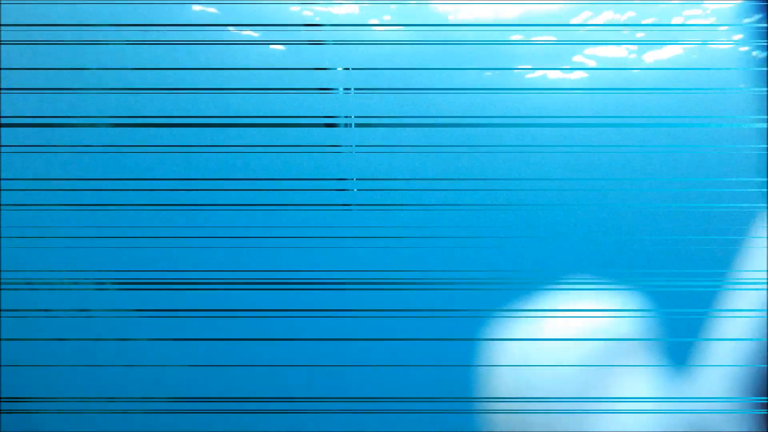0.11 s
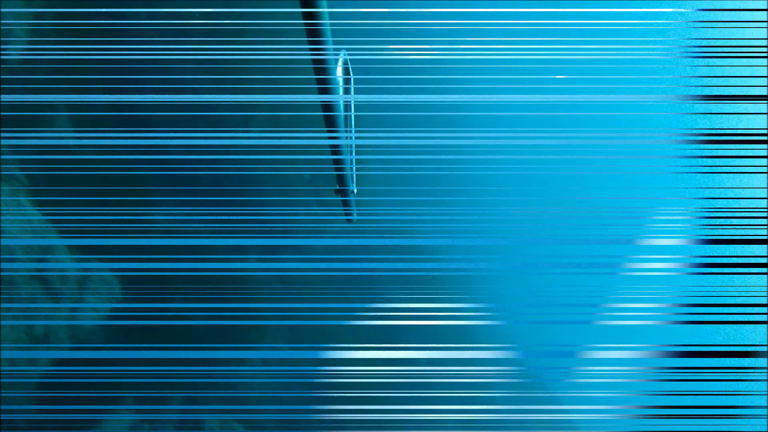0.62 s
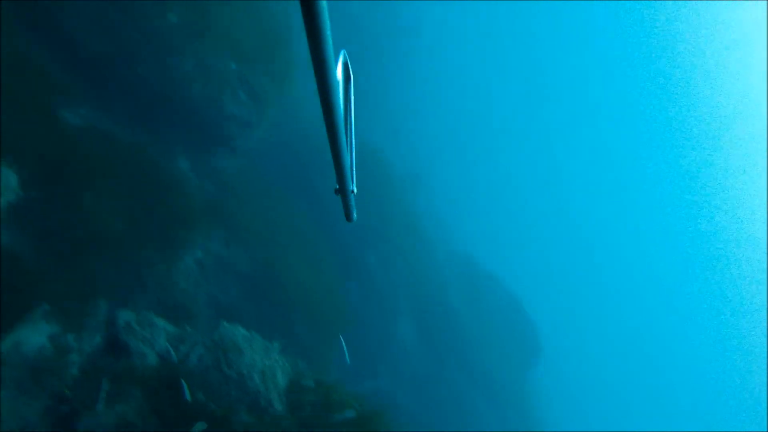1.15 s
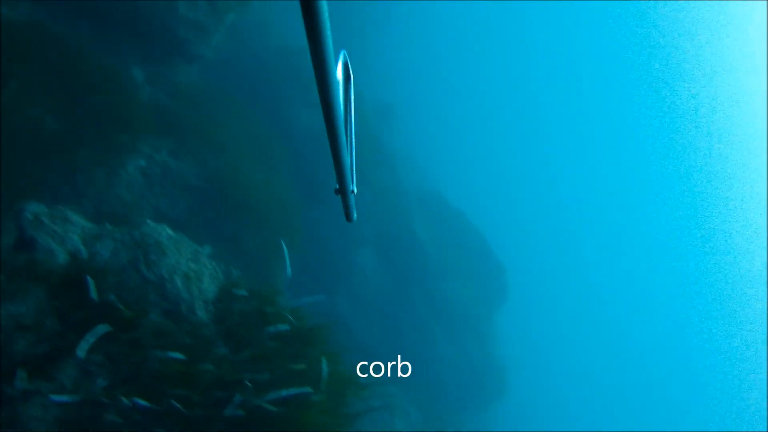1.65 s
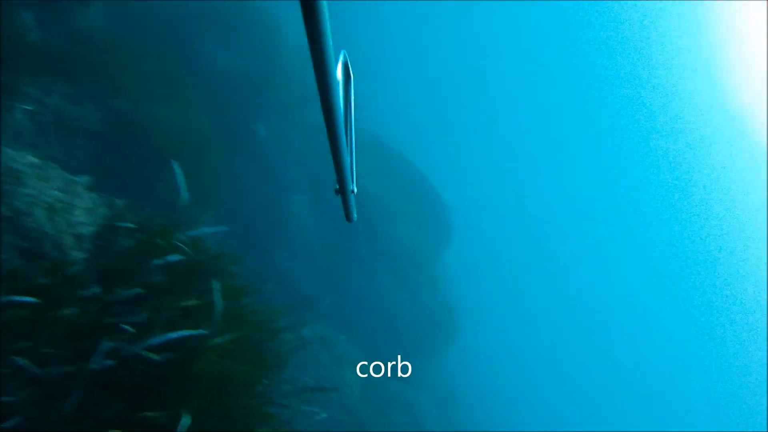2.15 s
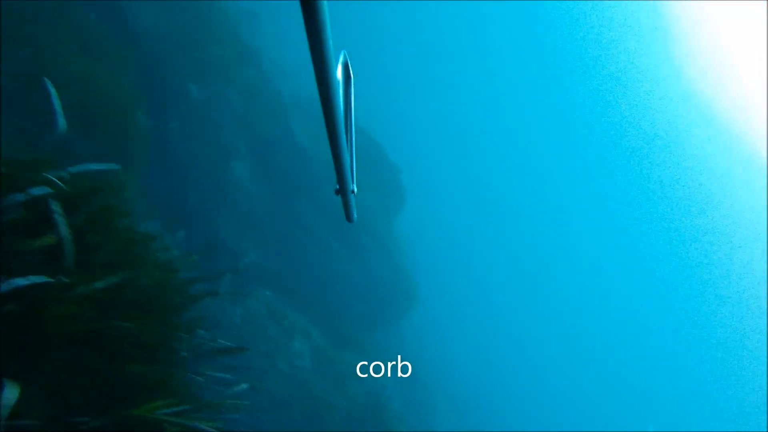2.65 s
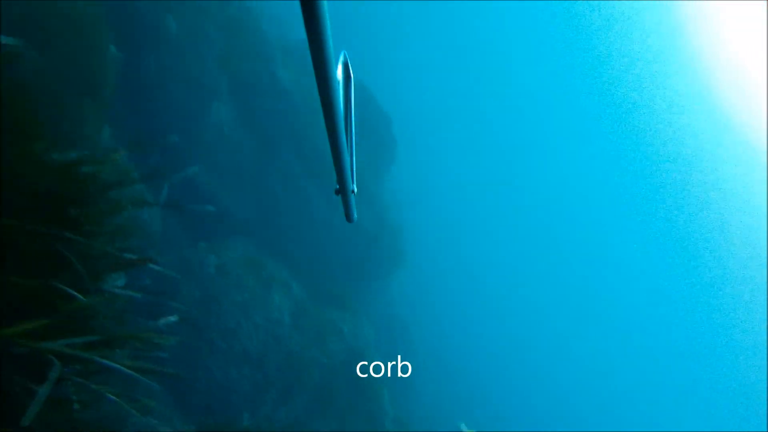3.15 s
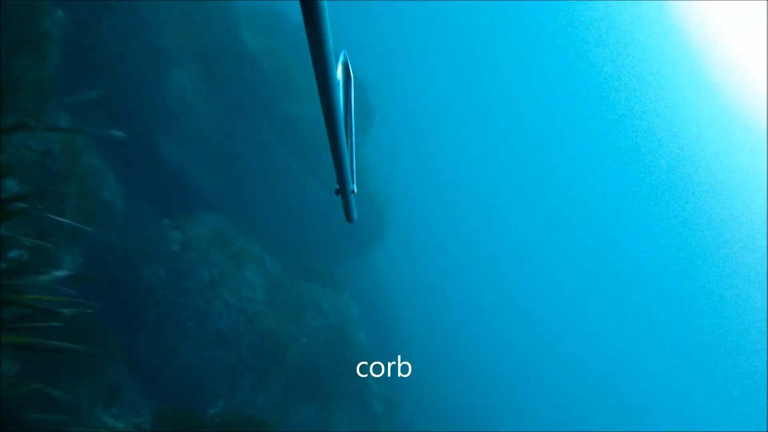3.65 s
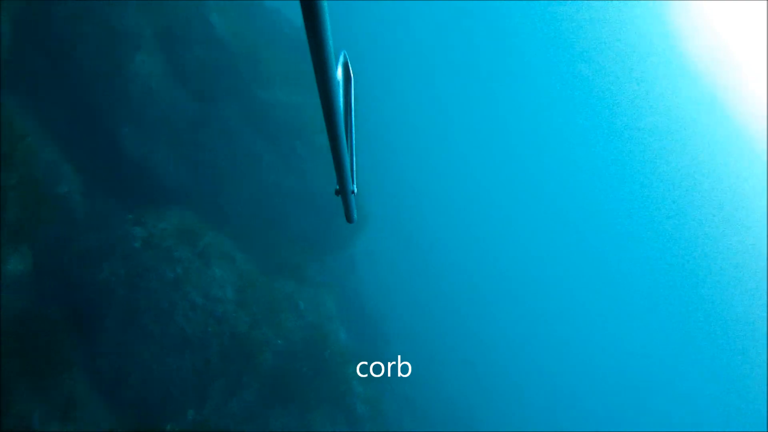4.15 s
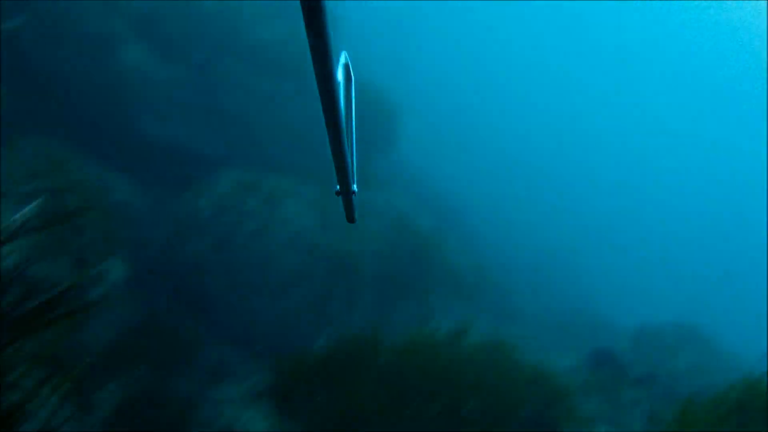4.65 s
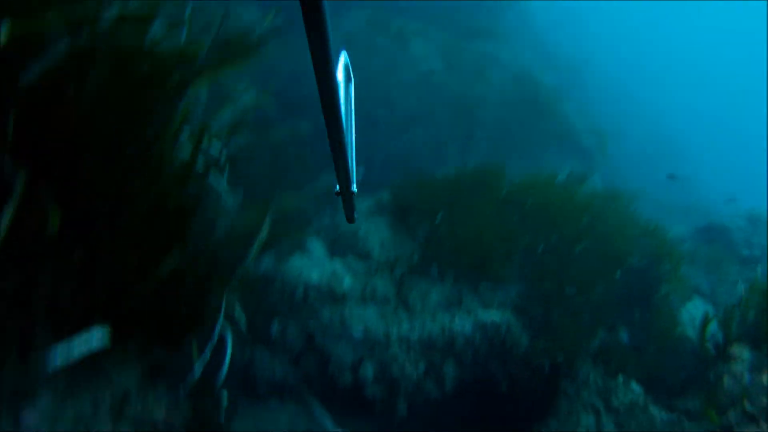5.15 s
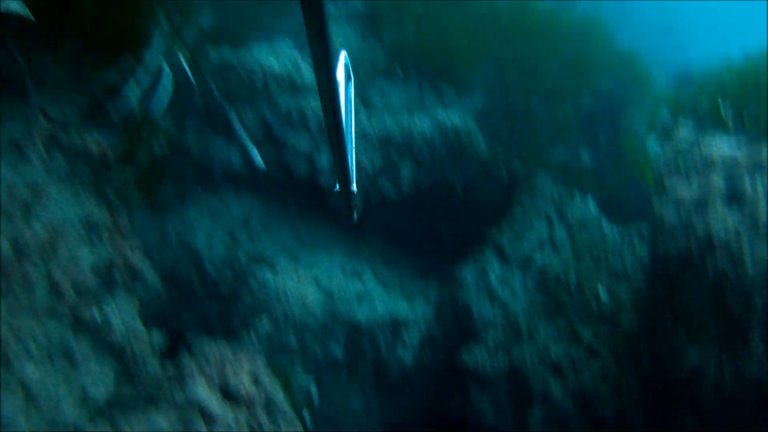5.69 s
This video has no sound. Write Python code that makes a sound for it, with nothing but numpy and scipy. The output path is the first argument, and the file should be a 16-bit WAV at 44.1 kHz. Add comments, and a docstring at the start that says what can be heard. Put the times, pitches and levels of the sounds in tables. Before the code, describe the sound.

A small sealed camera rides on a speargun under water. From 0 to 1.17 s handling is loud: low boom around 50 to 70 Hz surges in swells with gurgling, gloves rub the housing, and dry clicks cluster near 0.1 and 0.25 s. Dull thumps follow, with bubble-like rings near 0.2 and 0.6 to 0.7 s, a low groan around 0.85 s and the hardest knocks at 1.0 to 1.06 s. The sound is chopped off at 1.17 s. Then comes quiet murmur and hiss, thin shrimp crackle and faint wavering hums. Small taps occur at 2.55 and 3.0 s, and a short water surge with a soft bump at 3.2 s. Around 4.4 s another surge and rub lead into a faint ticking strap creak until 4.65 s. At 5.72 s a brisk scrape and knocks end in a hollow rising ring. Everything is close, boxy and muffled, with slightly gritty digital treble.

```python
"""Under water, a small sealed camera rides on a speargun. First the gun is handled roughly: water surges past the housing,
gloves rub it, parts knock and slip, bubbles ring. A cut, then calm sea: hiss, shrimp crackle, faint hums, taps, a creak,
a scrape and a last long ring. Flow and rubbing are wavering tones and shaped noise; knocks and blows are short fading tones
of the housing. The microphone is sampled at 12 kHz and each sample is held, which mirrors the sound into the treble."""
import sys
import numpy as np
from scipy import signal
from scipy.fft import rfft, irfft, next_fast_len
from scipy.io import wavfile
from scipy.ndimage import uniform_filter1d, map_coordinates

SR = 44100
rng = np.random.default_rng(int(sys.argv[2]) if len(sys.argv) > 2 else 0)


def to_wav(s):
    """Save 16-bit WAV."""
    ch = np.atleast_2d(s).T  # columns
    pcm = np.round(np.clip(ch, -1, 1) * 32767)  # PCM
    wavfile.write(sys.argv[1], SR, pcm.astype(np.int16))


def rack_gain(trim_db):
    """Turn a fader trim in dB into the linear factor to multiply a signal by."""
    fader = np.asarray(trim_db, float)
    return 10 ** (fader / 20)


N = 255780
CUT_S = 1.1655  # a cut between two shots: the rough handling is chopped off and the calm shot begins
CONTACT_LENGTH = SR // 16  # samples that one contact may last

# water surging round the housing, swell by swell: (time [s], level [dB], half width of the rise [s])
SWELLS = [(0.021, -26.5, 0.13), (.196, -16, 0.029), (.295, -20, 0.016), (.414, -17, .025),
          (.526, -17.5, 0.035), (.63, -16.5, 0.054), (.705, -19.5, 0.025), (.81, -22.5, 0.039),
          (.9, -25.5, .04), (1.004, -19.5, 0.049), (1.135, -20.5, .03), (1.23, -45, 0.045),
          (1.373, -40.5, 0.046), (1.48, -45.5, 0.028), (1.63, -46.5, 0.024), (1.72, -44.5, 0.032),
          (1.89, -41, 0.051), (2.02, -44, 0.075), (2.17, -52, 0.043), (2.33, -50.5, .04),
          (2.53, -42.5, 0.069), (2.72, -51, 0.071), (2.87, -45.5, 0.029), (3.05, -39, 0.074),
          (3.205, -23.5, 0.024), (3.27, -32, 0.022), (3.44, -43, .05), (3.63, -46.5, 0.053),
          (3.8, -40.5, 0.029), (3.94, -44, 0.038), (4.13, -41, 0.031), (4.276, -35.5, 0.049),
          (4.45, -28, 0.049), (4.56, -33, 0.038), (4.731, -38, 0.061), (4.89, -38, 0.024),
          (5.0, -38, 0.081), (5.256, -42.5, 0.053), (5.44, -42, 0.046), (5.577, -38, 0.046),
          (5.78, -35, 0.081)]
# the boom rises with the speed of the flow: (time [s], central pitch [Hz])
BOOM_PITCH = [(0, 48.5), (.4, 47.78), (.42, 43.54), (.52, 45.7), (.64, 56.64), (.85, 74.07), (.97, 59.44),
              (1.165, 58.05), (1.17, 43.9), (5.8, 43)]
# soft blows that flex the housing:
# (time [s], relative level [dB], low pitch [Hz], upper pitch [Hz], upper over low [dB])
BLOWS = [(0.249, -22, 230, 560, 1), (0.292, -29, 110, 357, 8.5), (.355, -23.5, 162, 396, -1.5),
         (.377, -25, 297, 344, 2.5), (0.398, -16, 270, 355, -2), (.501, -29.5, 285, 325, -15),
         (0.558, -17.5, 205, 353, -2), (0.605, -24, 118, 336, -17), (0.658, -22, 121, 302, -2.5),
         (0.688, -34, 111, 344, -4), (0.737, -34.5, 135, 394, 4), (0.962, -12.5, 147, 350, -0.3),
         (.991, -5.5, 110, 273, -8), (0.996, -8, 131, 294, -25), (1.005, -16, 168, 394, -18),
         (1.052, -14.5, 137, 286, 1), (1.106, -16.5, 157, 413, -5), (1.145, -23.5, 272, 283, -10.5),
         (2.561, -50.5, 285, 366, 6.5), (2.965, -42, 266, 302, -4.5), (3.005, -45.5, 268.4, 370, 1.5),
         (3.154, -46.5, 289, 291, 0), (3.184, -34, 109.6, 415, 0), (3.777, -44, 280, 324, 8),
         (4.176, -47, 288, 370, 7.5), (4.268, -51, 302, 318, 2), (4.423, -32, 287, 367, 5.5),
         (5.231, -37, 111.4, 314, -8)]
# the hardest blow, one row with the columns of BLOWS:
# (time [s], relative level [dB], low pitch [Hz], upper pitch [Hz], upper over low [dB])
HARDEST_BLOW = (1.0603, -1.2, 205, 440, -4)
# ringing modes of the housing: (frequency [Hz], relative level [dB], time to fade by 60 dB [s])
HOUSING_MODES = [(520, -0.5, 0.025), (700, 3, 0.017), (920, -2, 0.037), (1060, 0.5, 0.019),
                 (1220, -3.5, 0.032), (1400, -6, .03), (1650, -1, 0.023), (1890, -3.5, .025),
                 (2140, -0.5, 0.017), (2300, -7, 0.024), (2834, -2, 0.011), (3440, 8, 0.0071),
                 (4140, 4.5, 0.008), (4995, 8, 0.0052), (5410, 2.5, 0.0084)]
# sharp contacts on gun and housing:
# (time [s], relative level [dB], low-mode boost [dB], high-mode boost [dB], strongest frequency [Hz])
KNOCKS = [(.0243, -34, 2, -15, 1820), (.0442, -41, 3, -5, 2300), (.0672, -24.5, 5, -1.1, 2250),
          (.0857, -12, 1, -3, 2370), (.1017, -17, 5, -5.5, 2270), (.1221, -20.5, 7, -6.5, 2150),
          (.1446, -22, -11, -38, 2150), (.2507, -19, 8.5, -27, 1220), (.2547, -19, -15, -6, 1300),
          (.2604, -19, 5.5, -11, 1300), (.2644, -16.5, 11, -6.5, 1300), (.2685, -20, 7.5, -8, 2140),
          (.2922, -25.5, 1.5, -17.5, 1860), (.3172, -30.5, 10, -34, 1670), (.3254, -32, 9.5, -24, 1860),
          (.3561, -25, -5, -35, 1650), (.3745, -28, 3.5, -22, 1890), (.394, -27.5, 3.5, -16, 2340),
          (.4968, -24.5, -8, -27.5, 1710), (.5546, -25.5, -7, -17, 2480), (.6584, -30.5, 5, -29, 2440),
          (.7377, -36, 11, -19, 1850), (.9612, -34, 13.5, -14, 1620), (.9801, -30.5, 7, -2.5, 1590),
          (1.0024, -26, -14, -12.5, 1300), (1.0066, -19, -18.5, -23.5, 2150), (1.0605, -8.5, -1.5, 5, 2023),
          (1.0628, -15.5, 6, -11, 1660), (1.0713, -33, 13, -16, 2070), (1.1079, -24.5, 0, 5, 2050),
          (1.1153, -30.5, 6.5, 1.5, 2070), (1.1423, -42.5, 9, -4, 1320), (1.163, -35, 7, -0.3, 1300),
          (2.9607, -39.5, -0.5, -32, 1730), (3.1717, -35.5, -3, -15, 2280), (3.1936, -39, 5.5, -15, 2050),
          (3.2077, -46, 8.5, -17, 1310), (3.7813, -43.5, 7, -28, 1060), (4.2517, -44.5, -4, -21, 2110),
          (5.2335, -38, 5.5, -35, 1400), (5.3044, -52, 8, 0, 1060), (5.4992, -51, 6, -19, 1060),
          (5.7244, -50, -25, -4, 1230), (5.7399, -21.5, -34, -15.5, 1410), (5.7823, -20.5, 3, -15, 900)]
# longer scraping contacts:
# (time [s], relative level [dB], high-mode boost [dB], strongest frequency [Hz], contact time [s])
SCRAPE_EVENTS = [(.125, -39, -10, 2130, 0.089), (.165, -31, -6, 600, 0.053),
                 (.2039, -27, -24, 1400, 0.0069), (0.224, -24.5, -1.5, 1530, 0.04),
                 (0.2502, -17.5, 0, 1200, .019), (.3174, -25.5, -34, 816, 0.014),
                 (0.4985, -37, -28, 1820, 0.036), (.6044, -35, -7, 1800, 0.028),
                 (.6888, -52, -13, 2180, .014), (0.754, -31, 1.5, 2020, 0.077),
                 (0.777, -29.5, -7, 740, 0.028), (.8069, -26.5, -4, 1220, 0.0085),
                 (0.9846, -26, 0.5, 1400, 0.01), (.9962, -26, -8, 920, .008),
                 (1.0466, -26, -7, 700, 0.0049), (1.0537, -16, 2, 1060, 0.011),
                 (1.1032, -28, -3, 700, 0.019), (1.1417, -38, 1, 1290, 0.013),
                 (2.5476, -34.5, -31, 1400, 0.013), (2.5612, -40, -10, 1400, 0.0098),
                 (2.998, -45.5, -24, 1100, 0.015), (3.148, -48, -26, 1100, .014),
                 (3.176, -40.5, -26, 2050, 0.012), (3.187, -46, -25, 920, .025),
                 (4.1394, -48, -19, 1060, 0.026), (4.1626, -45.5, -16, 776, 0.043),
                 (4.4196, -36, -26, 1156, 0.011), (5.719, -18.5, -12.5, 1220, 0.017),
                 (5.723, -12, -13, 1400, 0.0083), (5.736, -12.5, -17, 1350, 0.0039),
                 (5.7446, -21, -10, 1400, 0.0095), (5.7614, -32, -6, 1540, 0.017),
                 (5.7866, -34, -9.5, 1240, 0.013)]
# glove and water dragging on the housing:
# (start time [s], length [s], low rub level [dB], bright rub level [dB])
RUB_STROKES = [(0, 0.11, -38, -54.5), (.121, 0.093, -27.5, -32.5), (0.212, 0.064, -32, -31),
               (0.28, 0.118, -36, -50), (0.408, 0.19, -40.5, -51), (.6, 0.11, -31.5, -49),
               (0.727, 0.09, -34.5, -43), (0.829, 0.11, -41.5, -64), (0.947, 0.045, -34.5, -51.5),
               (1.003, 0.026, -25.5, -53), (1.028, .13, -45.5, -56.5), (2.923, 0.25, -60.5, -72),
               (3.147, 0.084, -48, -64), (4.121, 0.18, -60.5, -66), (4.336, 0.122, -44.5, -52),
               (4.466, 0.18, -47.5, -57), (5.721, 0.07, -41.5, -34.5)]
# tone colour of the low rub: (frequency [Hz], relative level [dB per Hz])
LOW_RUB_COLOUR = [(110, -67.5), (180, -4), (398, 4.5), (534, -11), (775, -15.5), (853, -8.5), (1200, -33.5),
                  (1560, -64), (2640, -120)]
# tone colour of the bright rub: (frequency [Hz], relative level [dB per Hz])
BRIGHT_RUB_COLOUR = [(530, -33.5), (900, -5), (1130, -8), (1190, -6.5), (1400, -16), (1510, -0.5),
                     (1690, -24), (2210, -2), (2600, -19.5), (2860, -17), (4620, -35.5), (5330, -31),
                     (5900, -44), (7670, -77.5), (13000, -120)]
# soft ringing tones: trapped bubbles, and last a long ring of the housing:
# (time [s], level [dB], first pitch [Hz], pitch rise [share per s], time to fade by 60 dB [s])
RINGING_TONES = [(0.21, -28, 1400, 3.4, 0.056), (.22, -27.5, 3150, 4.2, 0.081),
                 (0.62, -37, 2480, .6, 0.078), (.684, -30, 930, .2, 0.23), (.683, -41, 2780, .3, .09),
                 (0.607, -22, 470, .3, .07), (0.691, -17.5, 450, .3, 0.067), (5.788, -12.5, 396, .3, 0.071)]
# the housing groans under strain: (time [s], pitch [Hz], level before smoothing [dB])
GROAN_CURVE = [(.74, 132.1, -41), (.794, 152.4, -32.5), (.85, 152.8, -22), (.885, 143.8, -33),
               (.95, 128, -28.5)]
# a strap creaks in runs of even slips: (first slip [s], last slip [s], gap [s], relative mid-run level [dB])
SLIP_RUNS = [(4.347, 4.442, .0215, -30.5), (4.484, 4.6516, .0255, -34)]
# modes that the strap drives most: (frequency [Hz])
STRAP_MODES = [1060, 1994, 3328]
# near shrimp snaps, thin in the bass: (time [s], relative level [dB], high-mode boost [dB])
SHRIMP_SNAPS = [(0.4558, -44, 1.5), (0.4733, -44, 0), (.678, -44, 3), (.845, -50.5, 10), (0.8915, -40.5, 5),
                (.922, -42, -8), (1.2441, -40, -7.5), (1.5435, -37.5, -22), (1.7105, -47, -5.5),
                (1.923, -37.5, -2.5), (2.1779, -47, -5), (2.3521, -42.5, -1.5), (2.518, -46, 4.5),
                (2.6781, -40, -0.5), (2.8422, -46, -9), (2.8729, -47, -16), (3.0981, -49, 1.5),
                (3.3273, -43.5, 5.5), (3.516, -36, -30.5), (3.7548, -33.5, 3.5), (3.8545, -53, 3.5),
                (3.9379, -39, -24.5), (4.5, -43.5, 5), (4.7046, -48, -5), (4.8922, -46, -23),
                (4.9356, -38.5, 0.5), (5.109, -48.5, -22.5), (5.206, -51.5, 6.5), (5.2759, -46.5, 4.5),
                (5.4592, -42.5, 0.5), (5.6122, -36.5, -3.5)]
# fuzzy far tones that swell and fade, one list each: (time [s], central pitch [Hz], central level [dB])
FAR_TONES = [
    [(1.7, 282.4, -78), (1.9, 287, -65.5), (2.48, 270.8, -61), (2.78, 276, -63.5), (2.9, 290, -64.5)],
    [(1.7, 385, -64), (2.0, 383, -65.5), (2.7, 381, -65), (3.0, 392.7, -54), (3.18, 404.4, -53.5),
     (3.45, 400, -60), (3.7, 387, -73)],
    [(4.7, 324.3, -70.5), (5.226, 327.2, -66.5), (5.7, 315, -67.5)],
    [(4.1, 2150, -66), (4.35, 2150, -65), (4.4, 2150, -84)],
    [(4.7, 1890, -70), (5.12, 1890, -62.5), (5.18, 1890, -75), (5.72, 1880, -70)],
]
# the calm sea grows a little brighter: (time [s], central murmur level [dB], central hiss level [dB])
SEA_LEVELS = [(1.2, -61.5, -62.5), (3.0, -61, -62.5), (3.6, -62.5, -60), (5.8, -62.5, -61)]
# tone colour of the murmur: (frequency [Hz], relative level [dB per Hz])
MURMUR_COLOUR = [(88, -37), (150, -6.5), (295, -5), (329, -4), (362, -5.5), (636, -13.5), (672, -13.5),
                 (740, -9), (801, -18.5), (1000, -21), (1300, -47), (2200, -120)]
# tone colour of the hiss: (frequency [Hz], relative level [dB per Hz])
HISS_COLOUR = [(530, -40), (900, -11), (1080, -8), (1280, -13.5), (1390, -2.5), (1570, -8.5), (1730, -4.5),
               (2110, -3), (2410, -9), (2600, -9), (2820, -13.5), (3190, -11), (3650, -14.5), (5330, -13.5),
               (5900, -12), (7670, -55), (13000, -120)]


def unit(x):
    """Scaled to rms 1."""
    return x / np.sqrt(np.mean(x ** 2) + 1e-20)


def curves(rows, outside=None):
    """One value per sample for each column after the time."""
    s, *columns = np.transpose(rows)
    t = np.arange(N) / SR
    return [np.interp(t, s, column, outside, outside) for column in columns]


def wobble(rate):
    """A smooth random curve, rate knots a second."""
    knots = rng.standard_normal(int(N * rate / SR) + 4)
    return map_coordinates(knots, [np.arange(N) * rate / SR])


def filtered(x, response):
    """x with each frequency scaled by the response."""
    m = next_fast_len(N + 8192)
    return irfft(rfft(x, m) * response(np.fft.rfftfreq(m, 1 / SR)), m)[..., :N]


def coloured(x, spectrum):
    """x given a (frequency [Hz], level [dB]) spectrum, rms 1."""
    f, db = np.transpose(spectrum)
    return unit(filtered(x, lambda hz: rack_gain(np.interp(np.log(hz + 1), np.log(f + 1), db))))


def gritty(rate, spread_db):
    """Noise whose strength wavers, rate knots a second, as grains catch and let go."""
    return rack_gain(spread_db * wobble(rate)) * rng.standard_normal(N)


def swaying(hz, blur_hz, share):
    """A tone on a pitch curve, partly steady and partly fluttering, rms 1."""
    turn = np.exp(2j * np.pi * np.cumsum(hz) / SR)
    flutter = wobble(blur_hz) + 1j * wobble(blur_hz)
    return unit((turn * (1 + share * flutter)).real)


def add_at(out, s, sound):
    """Adds a short sound to out, starting at s seconds."""
    start = round(s * SR)
    out[start:start + len(sound)] += sound


def surge():
    """The housing booms in the flow over a broad low heave; eddies gurgle above the boom, more in fast flow."""
    t = np.arange(N) / SR
    boom_hz, = curves(BOOM_PITCH)
    rough = t < CUT_S
    lull = rack_gain(np.where(rough, -30.5, -55))  # boom between the swells
    power = np.zeros(N)
    for s, db, width in SWELLS:
        slower = np.where(t > s, 1.3, 1)  # a swell fades slower than it rises
        same_part = rough == (s < CUT_S)  # no swell crosses the cut
        power += rack_gain(2 * db) * np.exp(-((t - s) / (width * slower)) ** 2) * same_part
    boom = np.sqrt(power + (lull * rack_gain(1.2 * wobble(5.1))) ** 2)

    heave_colour = [(12, -12.5), (25, -5.5), (33, -4.5), (45, -12.5), (64, 1), (110, -31.5), (200, -80)]
    heave = coloured(rng.standard_normal(N), heave_colour)
    tone = swaying(boom_hz + 1.5 * wobble(2.8), 9.8, 0.26)

    gurgle_db = np.where(rough, -40, -65) + 0.45 * (boom_hz - boom_hz.min())  # 0.45 dB per Hz of boom pitch
    eddies = rack_gain(gurgle_db + wobble(13)) * (boom / lull) ** 0.24  # gains 0.24 dB per dB of boom
    gurgle = coloured(gritty(30, 3.8), [(60, -30), (95, 10.5), (150, 0.5), (220, -6.0), (330, -45)])
    return boom * (tone + 0.49 * heave) + eddies * gurgle


def thumps():
    """Each blow is a few cycles of a damped, softly started flexing in two modes."""
    out, t = np.zeros(N + SR), np.arange(SR // 8) / SR
    start = 1 - np.exp(-t / 0.0026)
    fades = [(blow, 0.031) for blow in BLOWS]  # seconds to fade by 60 dB
    fades.append((HARDEST_BLOW, 0.02))  # choked at once
    for (s, db, low_hz, upper_hz, upper_db), t60 in fades:
        swing = np.sin(2 * np.pi * low_hz * t) + rack_gain(upper_db) * np.sin(2 * np.pi * upper_hz * t)
        add_at(out, s, -rack_gain(db + 12.5 - 60 * t / t60) * start * swing)
    return out[:N]


def contact(low_db, high_db, best_hz, focus_db, seconds=0):
    """A contact rings every mode, most of all those near best_hz; a lasting one keeps feeding them with noise."""
    t = np.arange(CONTACT_LENGTH) / SR
    hz, db, t60 = np.transpose(HOUSING_MODES)[:, :, None]
    tilt = np.interp(np.log(hz), np.log([1100, 1300, 2806, 3400]), [low_db, 0, 0, high_db])
    nearness = np.sum(np.exp(-(np.log(hz / best_hz) / 0.12) ** 2), 1, keepdims=True)
    db = db + tilt + rng.normal(0, 2.2, hz.shape) + focus_db * nearness
    rise = (1 - np.exp(-t * hz / 0.66)) ** 2  # each mode swings up within a cycle or two
    ring = rise * rack_gain(-60 * t / t60) * np.sin(2 * np.pi * (hz * t + rng.random(hz.shape)))
    modes = ring
    if seconds:
        press = (1 - np.exp(-6 * t / seconds)) * np.exp(-(t / seconds) ** 3)  # builds, holds, lets go
        noise = press * rng.standard_normal(ring.shape)
        modes = signal.fftconvolve(ring, noise, axes=1)[:, :len(t)]
    # a fed mode keeps the energy of a struck one
    match = np.linalg.norm(ring, axis=1, keepdims=True) / np.linalg.norm(modes, axis=1, keepdims=True)
    return np.sum(rack_gain(db) * match * modes, 0)


def taps():
    """Sharp knocks and slips set the housing ringing; each also drives a low mode near 700 Hz."""
    out = np.zeros(N + SR)
    for s, db, low_db, high_db, hz in KNOCKS:
        add_at(out, s, rack_gain(db - 7.5) * contact(low_db, high_db, [hz, 700], 9.6))
    return out[:N]


def scrapes():
    """Lasting contacts feed the housing modes with noise; the low modes gain as the scrape gets duller."""
    out = np.zeros(N + SR)
    for s, db, high_db, hz, seconds in SCRAPE_EVENTS:
        low_db = -6.5 + 10.5 * np.log2(1400 / hz)  # 10.5 dB per octave
        add_at(out, s, rack_gain(db - 6.0) * contact(low_db, high_db, [hz], 12.8, seconds))
    return out[:N]


def rub():
    """Friction: gritty noise in low and bright resonances of the housing; each stroke grips, holds, lets go."""
    low = coloured(gritty(60, 2.9), LOW_RUB_COLOUR)
    bright = coloured(gritty(150, 3.1), BRIGHT_RUB_COLOUR)
    t, out = np.arange(N) / SR, np.zeros(N)
    attack_s, release_s = 0.004, 0.012
    for s, length, low_db, bright_db in RUB_STROKES:
        press = np.interp(t, [s - attack_s, s, s + length, s + length + release_s], [0, 1, 1, 0])
        out += press * (rack_gain(low_db) * low + rack_gain(bright_db) * bright)
    return out


def ringing_tones():
    """Trapped bubbles, and last the housing, start softly and ring on a rising pitch, all longer than the blows."""
    out, t = np.zeros(N + SR), np.arange(SR // 8) / SR
    start = 1 - np.exp(-t / 0.0053)
    for s, db, hz, rise, t60 in RINGING_TONES:
        ring = np.sin(2 * np.pi * hz * (t + rise * t ** 2 / 2))
        add_at(out, s, rack_gain(db - 60 * t / t60) * start * ring)
    return out[:N]


def groan():
    """The strained housing gives a low fluttering tone with its octave."""
    hz, db = curves(GROAN_CURVE)[0], curves(GROAN_CURVE, -120)[1]
    soft = uniform_filter1d(rack_gain(db), SR // 60)
    return soft * (swaying(hz, 27, 0.24) + rack_gain(-9.5) * swaying(2 * hz, 30, 0.87))


def creak():
    """A strap sticks and slips at even gaps; each slip rings the housing, strongest mid-run."""
    out = np.zeros(N + SR)
    for first, last, gap, db in SLIP_RUNS:
        for s in np.arange(first, last + gap / 2, gap):
            arch_db = 8.5 * (2 * (s - first) / (last - first) - 1) ** 2  # weaker towards both ends
            slip_db = db - arch_db - 11.5 + rng.normal(0, 1.5)
            add_at(out, s, rack_gain(slip_db) * contact(-6.5, -13, STRAP_MODES, 16))
    return out[:N]


def shrimp():
    """Shrimp snaps ring the housing modes: near ones at set times over a thin random crackle."""
    out = np.zeros(N + SR)
    for s, db, high_db in SHRIMP_SNAPS:
        add_at(out, s, rack_gain(db - 7.5) * contact(-19, high_db, [2050], 9.5))
    count = 160
    for when, size in zip(rng.random(count), rng.exponential(size=count)):
        add_at(out, when * N / SR, rack_gain(-71.5 + 1.8 * size) * contact(-17.5, -2.4, [2100], 6.5))
    return out[:N]


def far_tones():
    """Faint hums whose pitch drifts slowly and whose strength flutters."""
    out = np.zeros(N)
    for hum in FAR_TONES:
        hz, db = curves(hum)[0], curves(hum, -120)[1]
        out += rack_gain(db + 2.5 * wobble(10)) * swaying(hz + 6 * wobble(6.9), 42, 1.1)
    return out


def sea():
    """Low murmur and hiss: two bands of gritty noise with slight unrest."""
    murmur_db, hiss_db = curves(SEA_LEVELS)
    murmur = rack_gain(murmur_db + 1.3 * wobble(2.1)) * coloured(gritty(34, 2.3), MURMUR_COLOUR)
    hiss = rack_gain(hiss_db + 0.8 * wobble(3.6)) * coloured(gritty(90, 2.0), HISS_COLOUR)
    return murmur + hiss


def scene():
    """All that shakes the housing; whatever still rings from the handling is chopped off at the cut."""
    hits = thumps() + taps() + scrapes() + ringing_tones() + creak() + shrimp()
    cut = round(CUT_S * SR)
    hits[cut:cut + SR // 30] = 0  # no hits for a thirtieth of a second
    return (surge() + hits + rub() + groan() + far_tones() + sea())[None]


def roll_off(x):
    """The treble ends steeply here."""
    return signal.sosfilt(signal.butter(12, 16440, fs=SR, output="sos"), x)


def record(dry):
    """Soft clipping, a guard filter, 12 kHz samples held four steps each, then a band limit."""
    clipped = dry / (1 + np.abs(dry / 0.87) ** 6) ** (1 / 6)
    # the guard keeps about 20 Hz to 5650 Hz
    guarded = filtered(clipped, lambda hz: 1 / (1 + (hz / 5650) ** 40) / (1 + (20 / (hz + 1)) ** 4))
    sampled = signal.resample(guarded, N * 12000 // SR, axis=1)
    held = np.repeat(sampled, 4, axis=1)  # the stairs mirror the sound into the treble
    limited = filtered(signal.resample(held, N, axis=1), lambda hz: 1 / (1 + (hz / 15400) ** 50))
    return roll_off(limited)


dry = scene()
out = record(dry)
to_wav(out)
```